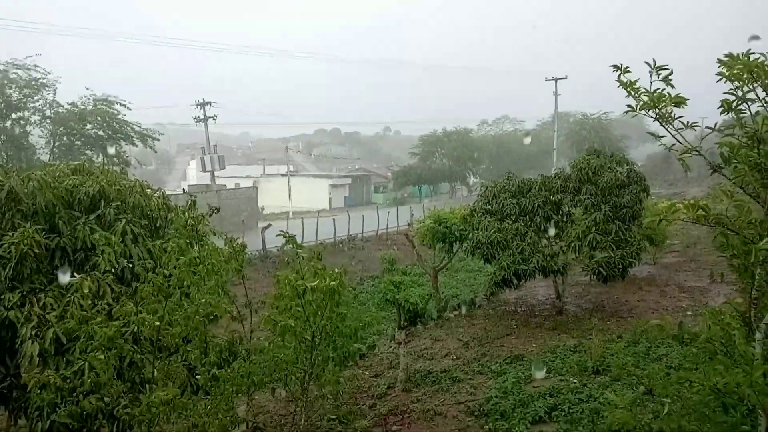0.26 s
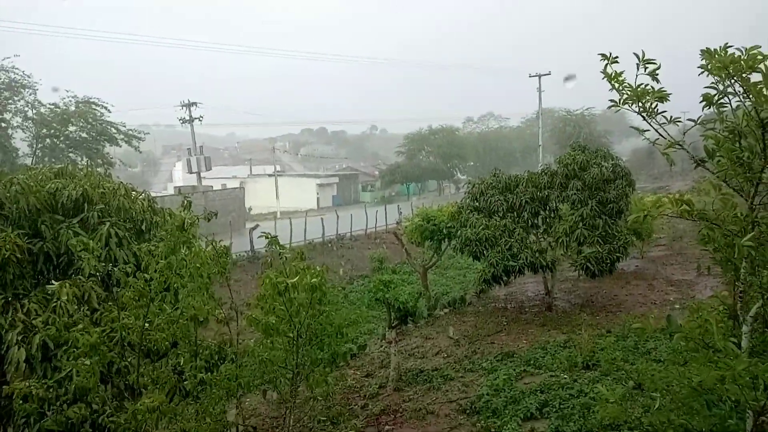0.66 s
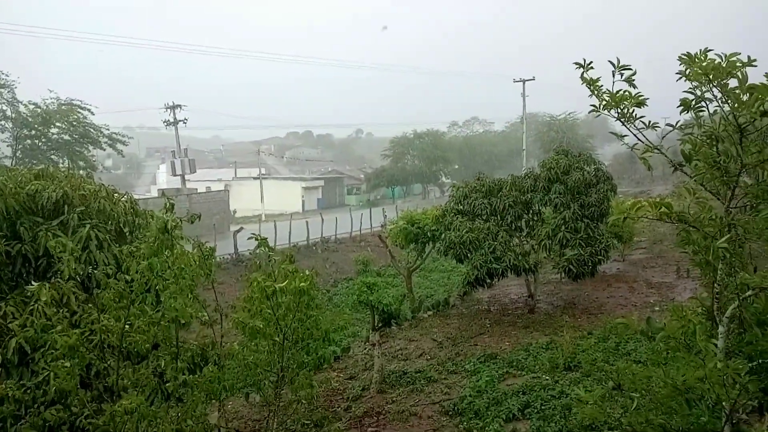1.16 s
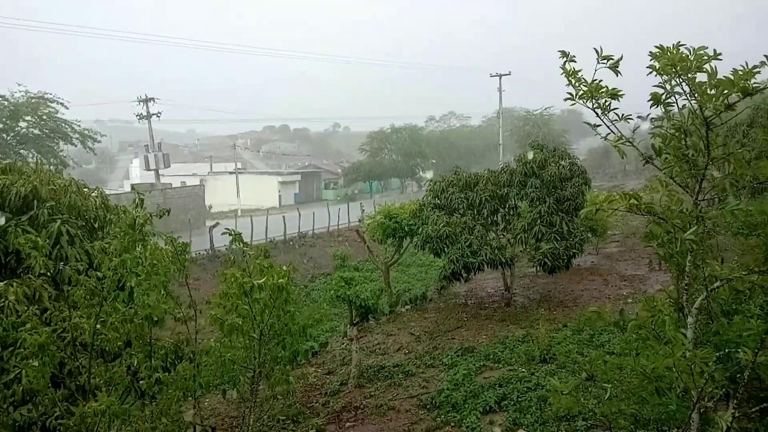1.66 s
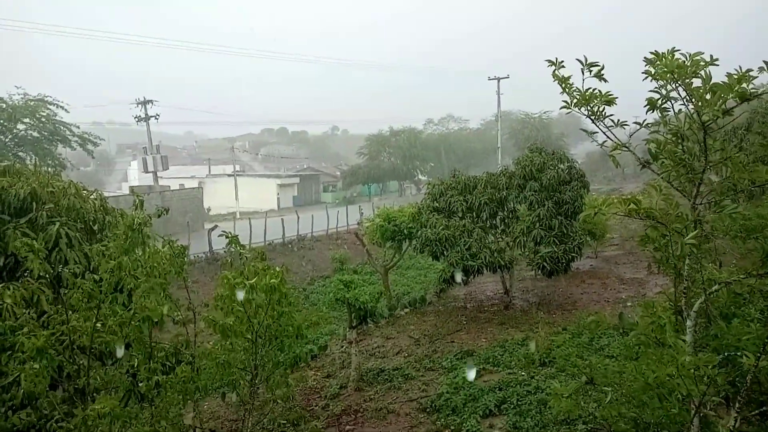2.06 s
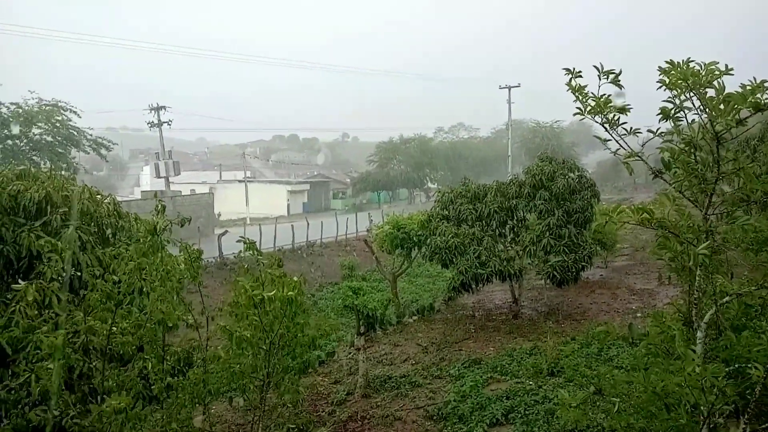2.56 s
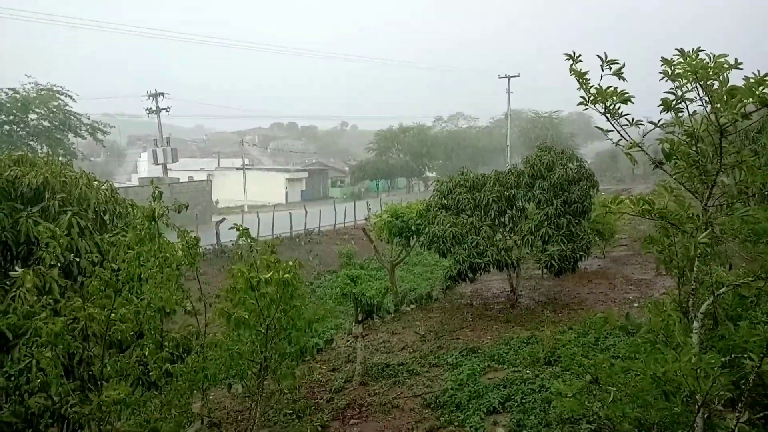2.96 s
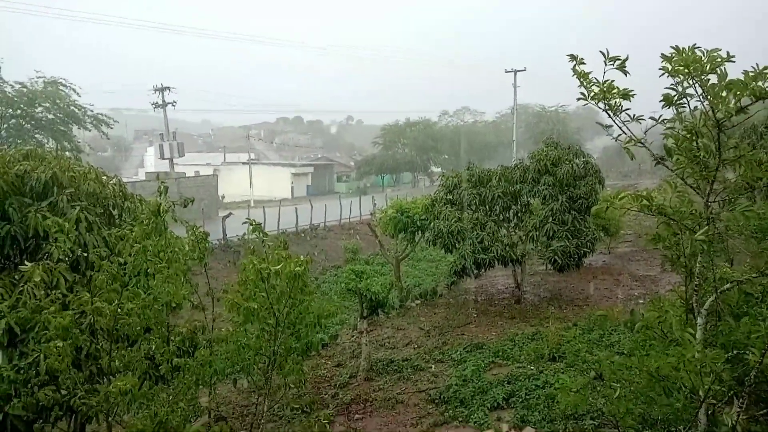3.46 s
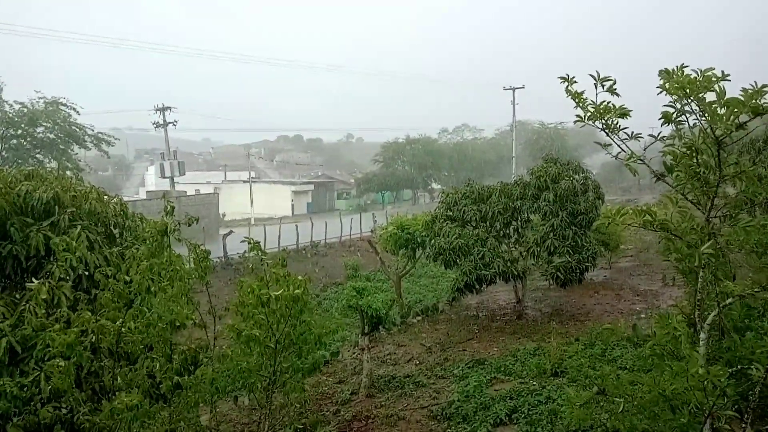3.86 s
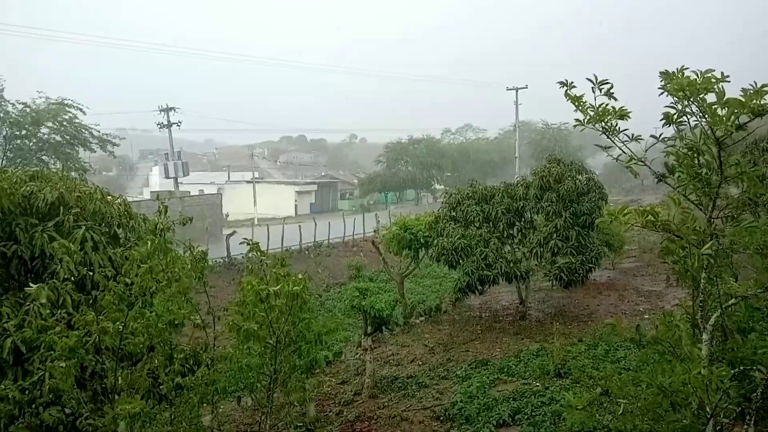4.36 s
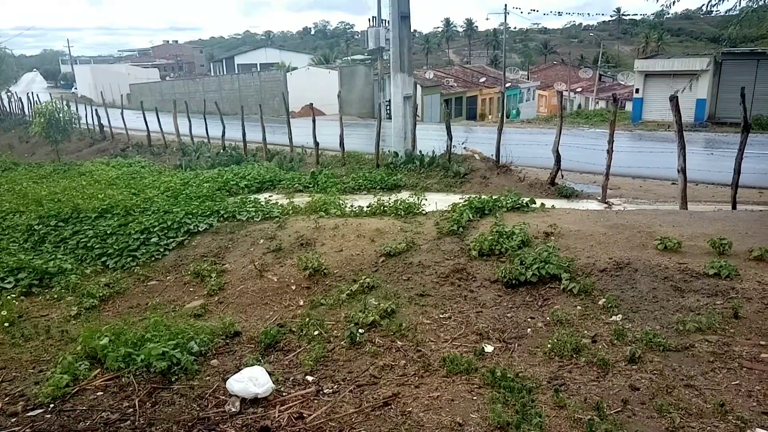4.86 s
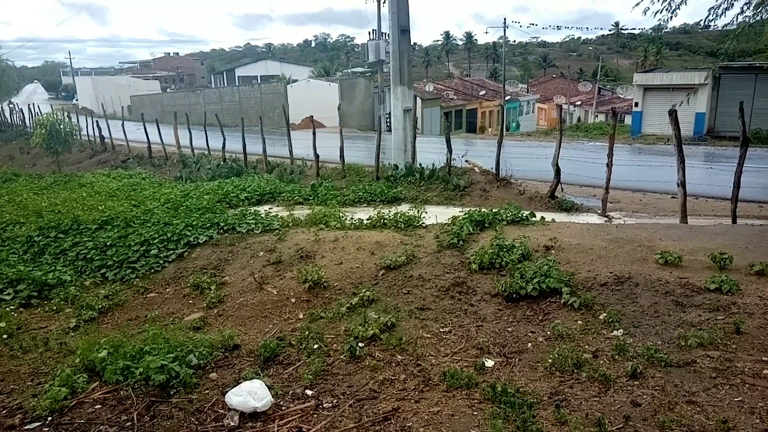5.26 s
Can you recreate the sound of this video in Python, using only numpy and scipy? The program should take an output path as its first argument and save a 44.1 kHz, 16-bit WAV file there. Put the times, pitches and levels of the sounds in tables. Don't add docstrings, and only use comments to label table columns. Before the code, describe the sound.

Loud close rain patter with sharp drop splats and wind thumps stops abruptly; after a tiny silence, a soft distant engine and tyre roar fades in.

```python
import sys
import numpy as np
from scipy import signal
from scipy.fft import rfft, irfft
from scipy.io import wavfile
from scipy.ndimage import uniform_filter1d

SR = 44100
rng = np.random.default_rng(int(sys.argv[2]) if len(sys.argv) > 2 else 0)


def output_pcm(signal):
    pcm = np.clip(np.atleast_2d(signal).T, -1, 1) * 32767
    wavfile.write(sys.argv[1], SR, np.round(pcm).astype(np.int16))


def ratio_of_db(decibels):
    return 10 ** (np.asarray(decibels, float) / 20)


N = 242550
T = np.arange(N) / SR
CUT_S, RESUME_S = 4.4665, 4.604


def evened(x):
    return x / np.sqrt(np.mean(x ** 2) + 1e-20)


def read(points, hz):
    f, value = np.transpose(points)
    return np.interp(np.log(hz + 1), np.log(f + 1), value)


def columns(rows):
    s, *values = np.transpose(rows)
    return [np.interp(T, s, v) for v in values]


def follow(control_db, full_db, db, share):
    return db + share * (control_db - full_db)


def coloured(x, gain_db):
    log_gain = np.maximum(gain_db(np.fft.rfftfreq(8192, 1 / SR)), -100) * np.log(10) / 20
    circle = np.concatenate([log_gain, log_gain[-2:0:-1]])
    taps = np.fft.ifft(np.exp(np.conj(signal.hilbert(circle)))).real[:4096]
    return signal.oaconvolve(x, taps)[:len(x)]


def band_db(hz, low_hz, high_hz):
    return -10 * np.log10((1 + (low_hz / (hz + 1)) ** 8) * (1 + (hz / high_hz) ** 8))


def split(x, edges_hz):
    hz = np.fft.rfftfreq(N, 1 / SR)
    below = [1 / (1 + (hz / edge) ** 8) for edge in edges_hz]
    return [irfft(rfft(x) * (upper - lower), N) for lower, upper in zip(below, below[1:])]


def flicker(size):
    return evened(uniform_filter1d(uniform_filter1d(rng.standard_normal(N), size), size))


def levelled(x, size):
    power = uniform_filter1d(uniform_filter1d(x ** 2, size), size)
    return evened(x / (power + 1e-12) ** 0.6)


def add(mix, s, sound):
    part = mix[round(s * SR):][:len(sound)]
    part += sound[:len(part)]


def drops(per_s, spread_db, largest):
    hits = rng.random(N) < per_s / SR
    sizes = ratio_of_db(spread_db * np.minimum(rng.exponential(1, N), largest)) * hits
    return evened(sizes - sizes.mean())


def spray(pushes, smear):
    puffs = signal.lfilter([1], [1, -np.clip(smear, 0, .995)], abs(pushes))
    return evened(puffs * rng.standard_normal(N))


def rain_colour(hz):
    # f/Hz, level/dB [dB per Hz]
    canopy_points = [(150, -29.5), (250, 1), (451, -5), (858, -0.5), (1150, -4.5), (1330, -0.5),
                     (1880, -1.5), (2560, 1), (4170, -17.5), (6440, -12.5), (8220, -28.5), (10100, -16.5),
                     (13600, -21.5), (15100, -5.5), (15900, -12)]
    return read(canopy_points, hz) + 1.86 * np.exp(-(2 * (hz - 3000) / 700) ** 2)


def rain():
    # t/s, patter level/dB
    patter = [(0.0, -22.5), (.1, -20.5), (.24, -20), (.47, -22), (.74, -23.5), (.9, -20.5), (1.15, -24.5),
              (1.6, -24), (2.0, -23), (2.4, -22.5), (2.82, -25), (2.91, -28), (2.99, -24), (3.3, -25.5),
              (3.63, -27), (4.07, -30.5), (4.3, -31), (4.46, -30)]
    patter_db, = columns(patter)
    tilted = (1 + np.tanh((T - 3.47) / .15)) / 2
    full_db = -22
    body_db = follow(patter_db, full_db, -27.5, 0.44) + .3 * tilted
    splash_db = follow(patter_db, full_db, -35, .25) - 2 * tilted
    fizz_db = follow(patter_db, full_db, -41, .05) + 2.4 * tilted
    top_db = follow(patter_db, full_db, -38.5, .5) + 1.6 * tilted

    sources = drops(2200, 5.44, 3.19), spray(drops(540, 5.8, 2.3), 0.9), rng.standard_normal(N)
    edges_hz = (270, 1300, 4200, 7500, 14000, 19000)
    ranges = [split(coloured(x, rain_colour), edges_hz) for x in sources]
    surge = flicker(size=500)
    drift = [flicker(size=5000) for _ in range(3)]
    layers = ((0.77, 0.23, 0.57, body_db + 1.48 * surge + 0.29 * drift[0]),
              (0.74, 0.043, 0.85, patter_db + 0.52 * surge),
              (0.44, 0.42, 0.71, splash_db + 0.59 * surge + 0.73 * drift[1]),
              (.3, 0.3, 0.93, fizz_db + 1.0 * surge + 0.5 * drift[1]),
              (.3, 1.0, 0.48, top_db + .9 * surge + .8 * drift[2]))
    out = np.zeros(N)
    for near, mist, wash, (near_share, mist_share, wash_share, level_db) in zip(*ranges, layers):
        out += ratio_of_db(level_db) * evened(near_share * near + mist_share * mist + wash_share * wash)
    return out


def swells(rows, calm_db):
    rise, fall = .3, 0.49
    shape = lambda u: np.clip(np.minimum(u / rise, (1 - u) / fall), 0, 1)
    calm = ratio_of_db(calm_db + 2.1 * flicker(size=3000))
    return calm + sum(ratio_of_db(db) * shape((T - s) / long_s) for s, long_s, db in rows)


def wind():
    # start t/s, length/s, level/dB
    gusts = [(0.658, 0.23, -27), (0.902, 0.13, -22), (1.183, 0.035, -32.5), (1.355, 0.079, -48),
             (1.555, 0.18, -38.5), (1.817, 0.083, -33.5), (2.025, 0.11, -35.5), (2.296, 0.22, -30),
             (2.5, 0.089, -31), (2.595, 0.13, -31), (2.723, 0.2, -25), (2.96, 0.18, -29),
             (3.12, 0.17, -34.5), (3.369, 0.28, -28), (3.793, 0.039, -37), (4.15, 0.22, -41)]
    # start t/s, length/s, level/dB
    deep_gusts = [(0.6, 0.2, -32), (0.845, 0.17, -40), (1.188, 0.04, -41), (1.611, 0.038, -40),
                  (2.18, 0.054, -38), (2.312, 0.09, -41), (2.517, 0.07, -38), (2.689, 0.26, -32),
                  (2.968, 0.094, -38), (3.166, 0.11, -35.5), (3.314, 0.35, -36), (3.798, 0.044, -39),
                  (4.132, 0.26, -38)]
    # f/Hz, level/dB [dB per Hz]
    gust_colour = [(15, -44.5), (25, -45), (49, -4.5), (97, -2), (150, -6.5), (303, -11.5), (500, -4),
                   (650, -20), (1100, -120)]
    lumps = rng.standard_normal(N)
    buffet = coloured(lumps, lambda hz: read(gust_colour, hz) + band_db(hz, 80, 283))
    rumble = coloured(lumps, lambda hz: read(gust_colour, hz) + band_db(hz, 18, 82.7))
    buffeting = swells(gusts, calm_db=-36.5) * levelled(buffet, size=1200)
    return buffeting + swells(deep_gusts, calm_db=-45) * levelled(rumble, size=2500)


def ping(hz, decay_s, noisy):
    t = np.arange(1500) / SR
    tone = np.sin(2 * np.pi * hz * t)
    x = ((1 - noisy) * tone + noisy * rng.standard_normal(len(t))) * np.exp(-t / decay_s)
    return x / abs(x).max()


def near_drops():
    # t/s, peak level/dB, brightness/dB, rebound/dB
    ticks = [(0.1257, -17.5, -1, -5), (0.1884, -17, 0, -0.5), (0.2262, -18, 5, -8.5), (0.4591, -19, -6, -4),
             (0.597, -15, 4, -8), (0.6586, -21, -5, -5), (0.7605, -18.5, 6, -5), (0.8763, -21, -4.5, 2),
             (1.047, -20, 9, -7), (1.1773, -13, 5, -12), (1.3274, -18, 4, -9), (1.4226, -7, -3, -3),
             (1.7346, -16, 6, -10), (1.9351, -6.5, -2, -1), (2.1505, -7, -12, -3), (2.2065, -17, -4, -7),
             (2.3561, -20, 8, -5), (2.6167, -20, 5, 0), (2.8732, -14.5, -2, -12), (2.8768, -18, 6, 3),
             (2.9009, -7, -5.5, 1), (3.1417, -10.5, -0.5, -1), (3.2147, -12, -11, 0), (3.4064, -16, 6, 1),
             (3.4613, -15, 1, -14), (3.8129, -12, 1, -3), (4.0893, -4.5, -3.5, -7), (4.213, -12, 1, -10),
             (4.35, -19, 16, 4), (4.459, -13, 1, 2)]
    # t/s, peak level/dB, brightness/dB
    splats = [(0.106, -12, -6), (0.256, -12, -15), (0.3671, -15.5, -12), (0.3944, -11, -7),
              (0.4604, -9, -14), (1.1257, -9, -8), (1.1625, -15, -9), (1.5085, -17, -8.5),
              (2.1046, -18, -15), (2.6843, -10, -13), (2.9412, -7, -16.5), (3.0212, -14, -2),
              (3.094, -16, -2), (1.1465, -13, -2), (3.4674, -20, -11), (4.198, -15, 0), (4.4445, -22, 8),
              (3.9389, -12, -20), (4.1405, -18, -13), (4.3974, -22, -16)]
    # t/s, peak level/dB, pitch f/Hz
    fat_drops = [(0.104, 1, 2380), (0.196, -3, 1350), (0.549, -4, 2710), (0.67, -3, 2040),
                 (0.697, -6, 1430), (0.713, -0.5, 2020), (0.9456, -4, 1500), (0.983, 0.5, 1060),
                 (1.201, -3.5, 2550), (1.322, -4, 2420), (1.408, -9, 2680), (1.486, -5.5, 1350),
                 (1.575, -9, 1530), (1.721, -0.5, 2550), (2.134, -1, 2520), (2.237, -5, 2480),
                 (2.306, -2, 2300), (2.577, -3.5, 1670), (2.653, -7, 2690), (2.75, -5, 2200),
                 (2.861, -9, 2500), (3.02, -5, 2420), (3.176, -12, 910), (3.22, -5.5, 2650),
                 (3.283, -7.5, 1940), (3.399, -6, 1860), (3.421, -8, 1690), (3.461, -2.5, 1780),
                 (3.786, -11, 970), (4.387, -10.5, 1040)]
    ring, crack, thuds, glint = np.zeros((4, N))
    small = [(CUT_S * a, -22.5 + 6 * (b - .5), 12 * (c - .5), -5.5) for a, b, c in rng.random((30, 3))]
    rebounding_splats = [(*row, -6) for row in splats]
    for s, db, bright_db, rebound_db in ticks + rebounding_splats + small:
        hiss_db = -12.0 - 0.25 * bright_db
        hiss_s = 0.0036 * ratio_of_db(-.7 * bright_db)
        rebound_s = .0035 * rng.uniform(.75, 1.25)
        for late_s, peak_db in ((0, db - 3.5), (rebound_s, db - 7.0 + rebound_db)):
            at_s = s + late_s
            body = ping(6100, 0.00037, 0.18) + ratio_of_db(hiss_db) * ping(5200, hiss_s, 0.62)
            add(ring, at_s, ratio_of_db(peak_db + min(-bright_db, 0)) * body)
            snap = ping(9600, 0.00033, 0.41) + ratio_of_db(-9) * ping(9000, 0.0022, 1.0)
            add(crack, at_s, ratio_of_db(peak_db + 2.9 * min(bright_db, 0) + 1.5) * snap)
            add(glint, at_s, ratio_of_db(peak_db + .6 * bright_db - 4) * ping(14900, .0005, .2))
    for s, db, hz in fat_drops:
        add(thuds, s + 0.000988, ratio_of_db(db - 3.0) * ping(hz, 0.00086, 0.18))
    bands = ((ring, 4000, 8000), (crack, 7200, 17000), (thuds, 400, 5000), (glint, 11000, 19000))
    return sum(coloured(x, lambda hz: band_db(hz, low_hz, high_hz)) for x, low_hz, high_hz in bands)


def thumps():
    # t/s, peak level/dB, f/Hz
    eddies = [(0.591, -21, 120), (0.678, -15.5, 121), (0.924, -15, 140), (1.19, -20, 108),
              (1.578, -20, 91.5), (1.962, -29, 109), (2.041, -28, 88), (2.164, -25, 113),
              (2.255, -21.5, 180), (2.411, -22, 192), (2.519, -32, 110), (2.66, -19, 127),
              (2.714, -13.5, 161), (2.948, -15.5, 143), (3.04, -18, 191), (3.399, -17, 96),
              (3.444, -21, 170), (3.805, -22, 101)]
    out, t = np.zeros(N), np.arange(3000) / SR
    envelope = (t / 0.0092) * np.exp(1 - t / 0.0073)
    for s, db, hz in eddies:
        add(out, s, -ratio_of_db(db - 2.5) * np.sin(2 * np.pi * hz * t) * envelope)
    return out


def narrow(hz, width_hz):
    r = np.exp(-np.pi * width_hz / SR)
    slow = signal.lfilter([1], [1, -r], rng.standard_normal(N) + 1j * rng.standard_normal(N))
    return evened((slow * np.exp(2j * np.pi * np.cumsum(hz) / SR)).real)


def road():
    # t/s, firing rate f/Hz, tyre roar level/dB
    speed = [(4.604, 37.84, -69), (4.688, 38.05, -59), (4.776, 37.76, -51.5), (4.944, 39.45, -48),
             (5.266, 40.2, -45.5), (5.5, 40.36, -45)]
    # multiple, level/dB [rms at full roar], share of the fade followed
    orders = [(2, -51, 1.4), (3, -53.5, 0.71), (4, -57.5, 1.1)]
    # multiple, level/dB [below the roar]
    weak_orders = [(5, -27), (6, -20), (7, -32), (9, -32), (13, -34.5)]
    # f/Hz, level/dB [dB per Hz]
    roar_colour = [(40, -30), (100, -20), (170, -10), (395, -29.5), (564, -30), (820, -11.5), (980, -14.5),
                   (1170, -16), (1310, -19), (1590, -2), (1870, -8.5), (2170, -15.5), (2900, -15),
                   (6300, -25), (8200, -50), (10700, -76), (18000, -120)]
    # f/Hz, width/Hz, level/dB
    roar_peaks = [(750, 130, 2.5), (1464, 89, 5.5), (1650, 120, 3.5), (1850, 120, 5), (2630, 280, 3.5),
                  (3500, 420, 5.5), (15400, 2600, 18)]
    # f/Hz [at the end], width/Hz, level/dB
    whine_tones = [(840, 9, -12), (1190, 7.5, -14.5), (1830, 45, -14.5), (1900, 18, -9.5), (2650, 28, -19),
                   (3560, 40, -26)]
    # t/s, peak level/dB, f/Hz, length/s
    squeak_tones = [(4.815, -53, 3720, 0.018), (4.955, -46, 1570, .03), (5.03, -48, 1560, 0.023),
                    (5.245, -55, 3700, .03), (5.376, -52, 1500, .016), (5.4, -48, 1525, .02),
                    (5.426, -51, 1520, .016), (5.452, -46, 1530, .02), (5.478, -50, 1500, .016),
                    (5.45, -50, 3560, .02), (5.475, -52, 3380, .02), (5.482, -53, 2620, .025),
                    (4.962, -72, 14700, .012)]

    hz, roar_db = columns(speed)
    turn = 2 * np.pi * np.cumsum(hz) / SR
    turn -= turn[round(5.3022 * SR)]
    engine = np.zeros(N)
    for k, db, share in orders:
        order_db = follow(roar_db, -45, db, share) + 1.6 * flicker(size=3000)
        engine += np.sqrt(2) * ratio_of_db(order_db) * np.cos(k * turn - .3)
    weak = sum(ratio_of_db(db + 5.8 * flicker(size=2500)) * np.cos(k * turn) for k, db in weak_orders)

    def roar_db_at(f):
        peaks = sum(db * np.exp(-(2 * (f - at) / width) ** 2) for at, width, db in roar_peaks)
        tyres = read(roar_colour, f) + band_db(f, 20, 7500)
        return np.maximum(tyres, -59 + band_db(f, 2000, 30000)) + peaks

    throb = 1 + 0.13 * np.cos(turn)
    drive = rng.standard_normal(N) * throb * ratio_of_db(0.69 * flicker(size=400))
    roar = coloured(drive, roar_db_at)
    whines = sum(ratio_of_db(db) * narrow(f * np.sqrt(hz / hz[-1]), width_hz) for f, width_hz, db in whine_tones)
    squeaks = sum(ratio_of_db(db) * np.exp(-(2 * (T - s) / long_s) ** 2) * np.sin(2 * np.pi * f * T)
                  for s, db, f, long_s in squeak_tones)
    return engine + ratio_of_db(roar_db - 0.5) * (evened(evened(roar) + whines) + weak) + squeaks


def knocks():
    # t/s, peak level/dB, thump f/Hz, click level/dB [relative]
    touches = [
        (4.757, -41, 140, -3),
        (4.814, -44, 150, -25),
        (5.2984, -30.5, 136, -0.5),
        (5.497, -58, 150, -6),
    ]
    out, t = np.zeros(N), np.arange(1200) / SR
    late = t - .0037
    envelope = np.where(late < 0, np.exp(-(late / .0028) ** 2), np.exp(-late / 0.0029))
    onset = np.minimum(t / .0015, 1)
    dull = np.cos(2 * np.pi * 1200 * (t - .0009)) * np.exp(-((t - .0009) / 0.00066) ** 2)
    for s, db, hz, click_db in touches:
        push = np.cos(2 * np.pi * hz * late) * envelope
        add(out, s, ratio_of_db(db) * (push * onset - ratio_of_db(click_db) * dull))
    return coloured(out, lambda hz: band_db(hz, 45, 4000))


def scene():
    cut = np.clip((CUT_S - T) / 0.0025 + 0.28, 0, 1) ** 2
    resume = np.clip((T - RESUME_S) / 0.0044, 0, 1)
    storm = rain() + near_drops() + wind() + thumps()
    return (storm * cut + road() * resume + knocks())[None]


def top_cut(x):
    return signal.sosfilt(signal.butter(12, 17100, fs=SR, output="sos"), x)


def record(dry):
    soft = .8 * np.tanh(dry / .8)
    low_pass = signal.firwin(1023, 15790, window=("kaiser", 7), fs=SR)
    limited = signal.oaconvolve(soft, low_pass[None], "same")
    return top_cut(limited)


dry = scene()
out = record(dry)
output_pcm(out)
```